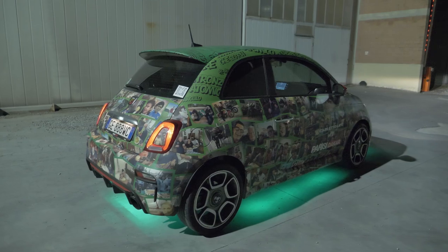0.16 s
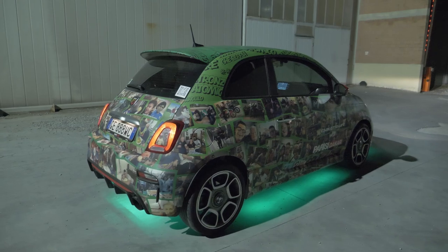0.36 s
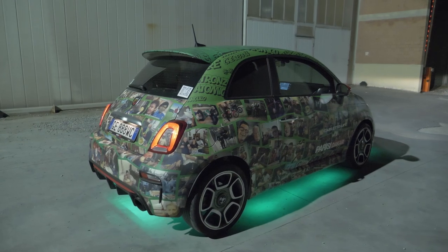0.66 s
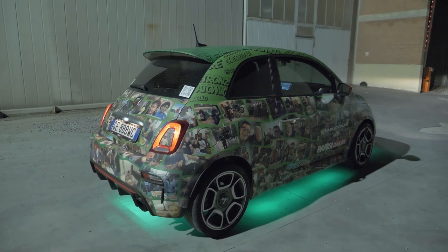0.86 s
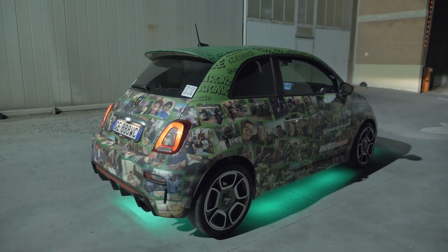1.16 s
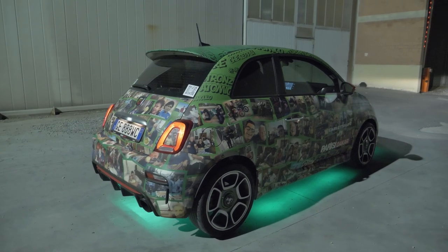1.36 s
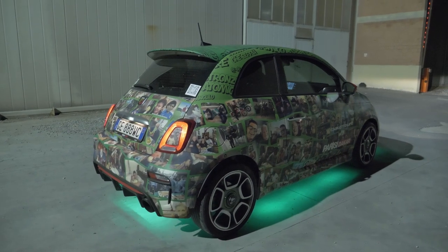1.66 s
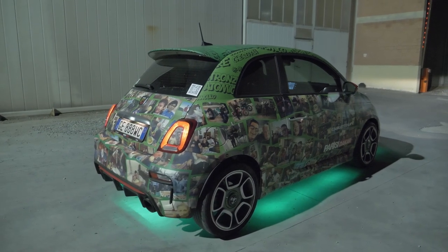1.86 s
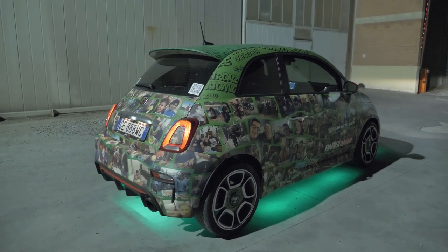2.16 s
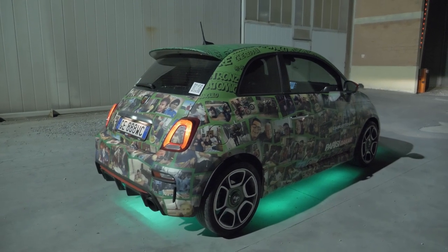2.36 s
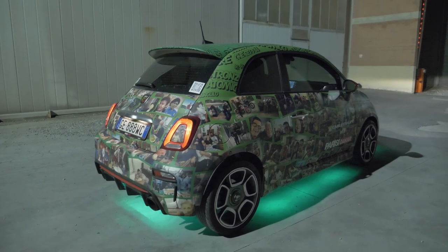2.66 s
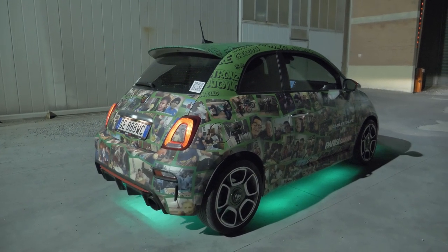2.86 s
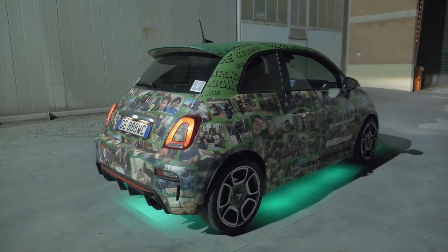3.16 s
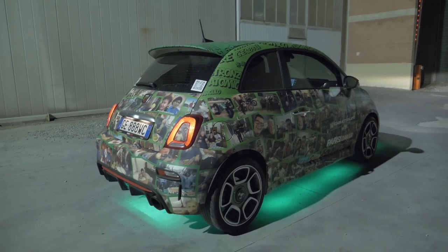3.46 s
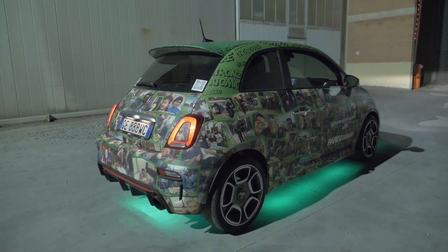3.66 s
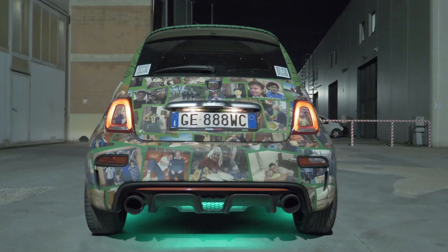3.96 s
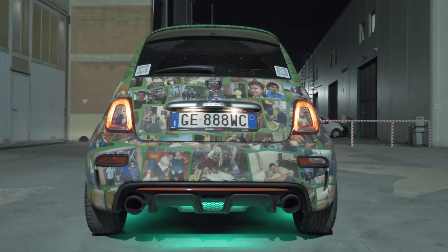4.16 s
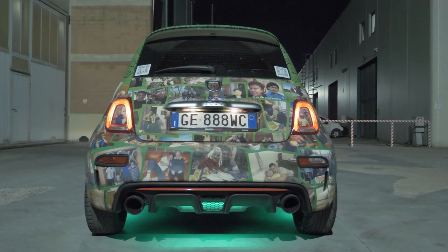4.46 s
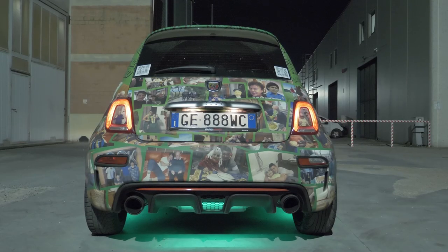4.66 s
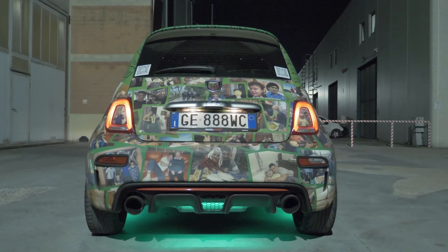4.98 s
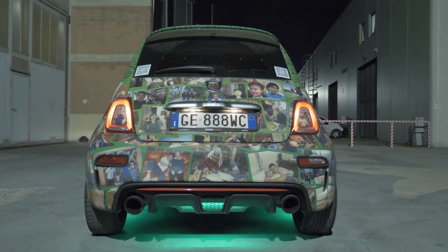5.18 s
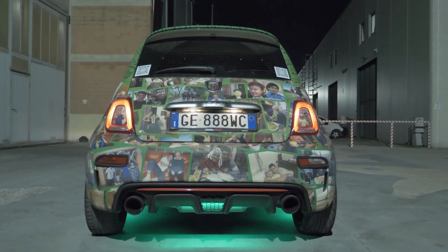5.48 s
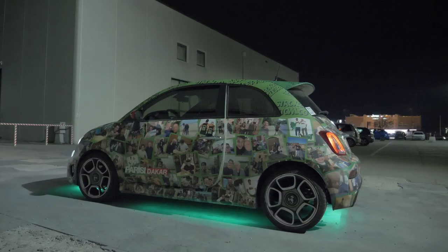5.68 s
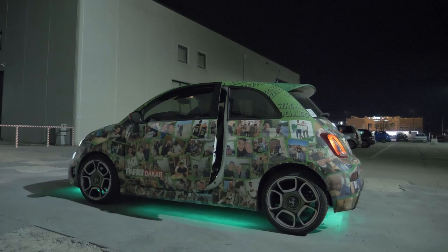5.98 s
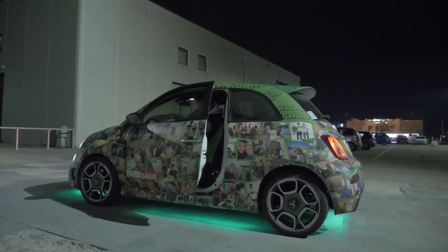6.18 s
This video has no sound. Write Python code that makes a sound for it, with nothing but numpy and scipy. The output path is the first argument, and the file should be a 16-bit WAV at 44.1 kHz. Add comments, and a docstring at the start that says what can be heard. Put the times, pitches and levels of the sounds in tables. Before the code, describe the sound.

Close, booming exhaust of a small idling car turns rounder, then abruptly becomes a quiet hum with faint door latch clicks.

```python
"""A deep boom with a raspy chuff, close to one tailpipe of a small four-cylinder petrol car idling in a
concrete yard at night. The microphone is at the rear quarter, then straight behind the tailpipes, then a
few metres off the side, where the door is unlatched. Each firing sends a boom and a puff of gas down the
exhaust and sets it ringing. Under it lie the rush of engine bay and yard and the fuel pump's whine."""
import sys
import numpy as np
from scipy import signal
from scipy.fft import rfft, irfft, next_fast_len
from scipy.io import wavfile
from scipy.ndimage import uniform_filter1d

SR = 44100
rng = np.random.default_rng(int(sys.argv[2]) if len(sys.argv) > 2 else 0)


def wav_out(sig):
    """Save sig, one row per channel (or a flat mono array), as 16-bit PCM at SR to the path in sys.argv[1]."""
    wavfile.write(sys.argv[1], SR, np.round(np.clip(np.atleast_2d(sig).T, -1, 1) * 32767).astype(np.int16))


N = 279020
T = np.arange(N) / SR

# microphone positions: from t/s, to t/s, a firing of the first cylinder t/s, firing rate/Hz
QUARTER_MIC = (.0455, 3.817, .0810, 28.393)
BEHIND_MIC = (3.817, 5.657, 3.8621, 28.265)
SIDE_MIC = (5.657, 6.4, 5.6848, 28.09)
# steady rush of engine bay and yard at each position: f/Hz, relative spectral level/dB
QUARTER_RUSH = [(20, -1), (60, -0.5), (250, 11.5), (500, -3), (1200, -2), (1500, -8.5), (2200, -12.5),
                (2800, -20.5), (5000, -26), (6700, -29.5), (8500, -24.5), (10000, -38), (13000, -37.5),
                (16000, -44)]
BEHIND_RUSH = [(20, 2), (60, 20), (250, 13), (500, 7), (850, 1.5), (1700, -5), (2700, -15), (3400, -17.5),
               (4600, -18.5), (6700, -21.5), (8500, -20), (10000, -31), (13000, -30), (16000, -41)]
SIDE_RUSH = [(20, 3), (60, 4), (250, 11.5), (500, 2.5), (750, -1.5), (1200, -9), (2000, -12.5),
             (2800, -20.5), (5000, -24), (6600, -27), (8600, -24), (10000, -37), (13000, -35), (16000, -44)]
# faint electrical whistles: f/Hz, relative level/dB
WHISTLES = [(6002, -73), (8027, -75), (12010, -77.5)]
# fuel pump from the rear quarter, where its whine fades in and out: t/s, f/Hz, level/dB
QUARTER_WHINE = [(0.08, 3447, -47.5), (0.65, 3440, -53), (0.97, 3450, -46), (1.21, 3446, -59),
                 (2.14, 3447, -48), (2.18, 3447, -53), (3.01, 3450, -44), (3.63, 3440, -55),
                 (3.78, 3449, -50)]
# door latch clicks: t/s, relative level/dB, f/Hz
LATCH_CLICKS = [(5.7813, -40, 3840), (5.8024, -40, 4750), (5.9419, -42, 7540), (5.984, -37, 5110)]
# colour of the gas puffs (the side shares the one from behind): f/Hz, relative spectral level/dB
QUARTER_PUFF = [(300, -26), (600, 3), (1400, -1.5), (2300, -18), (2700, -7.5), (3600, -12), (4700, -14.5),
                (5400, -22), (8400, -22), (10000, -29.5), (13000, -29.5), (16000, -44)]
BEHIND_PUFF = [(300, -8), (700, 1), (1100, -5), (2000, -3), (2700, -11.5), (3400, -0.5), (4500, -17.5),
               (8500, -13), (10000, -28), (13000, -22.5), (16000, -33)]
# two burns that bark out above the rest: t/s, extra force/dB
HARD_BURNS = [(4.216, 5), (5.065, 8.5)]
# exhaust resonances: f/Hz, width/Hz, level/dB, lag after the boom/s, turbulent share/0-1,
# then kick/dB for each of the four cylinders
QUARTER_RINGS = [ (381.5, 34, -33, .003, 0.0062, -19, -3, -12.5, -12),
                 (590, 67, -48.5, -.004, 0.36, -5, -8, -4, -5),
                 (925, 93, -37, -.0075, 0.11, -7.5, -6, -6.5, 2),
                 (1036, 105, -42, -.007, .1, -20, -9.5, -8, 2.5),
                 (1168.4, 94, -35.5, -.007, 0.2, -3.5, -1, 0, 1.5),
                 (1219, 45.5, -39.5, -.006, 0.5, -4.5, 3, -4, 1),
                 (1682, 253, -42.5, -.005, 0.68, 4.5, 5.5, -2.5, -12),
                 (2015, 130, -51, -0.004, 0.57, 1, 1, 0, -2),
                 (2248, 110, -47, -.0065, 0.52, 2, 3.5, 1.5, -1),
                 (2846, 160, -58.5, -.0065, 0.74, 6, -1, -9, 10),
                 (4730, 110, -65.5, -0.01, 0.74, 1, 4, -16, 2)]
BEHIND_RINGS = [ (330.3, 43, -36.5, .004, 0.32, -5, -3, -4.5, -1.5),
                (615, 48, -35.5, -.004, 0.076, -7, 3.5, -20, 1),
                (1080, 86, -50, -0.0036, 0.91, -1, 4, -7, 4),
                (1516, 66, -45.5, -.007, 0.17, -5, -5.5, -3, 0.5),
                (1682, 146, -44.5, -.007, 0.4, -10, -11, 0.5, -6),
                (2300, 230, -55, -.007, 0.62, -1, -3, 0, -2),
                (3960, 160, -58.5, -.007, 0.75, 0, -4, -3, -1)]
SIDE_RINGS = [ (333, 50, -47, -0.018, 0.2, -11, -1, -12, 0), (627, 41, -44.5, -.002, .1, -13, 2, -17, 0),
              (1640, 160, -56.5, -.005, 0.81, -5, -7, 0, 0)]
# orders of the exhaust boom: multiple of the firing rate, relative level/dB
QUARTER_BOOM = [(1, -18.5), (2, -11), (3, -11), (4, 2), (5, -5), (6, -4.5), (7, -10.5), (8, -15), (9, -40),
                (10, -27.5), (11, -13.5)]
BEHIND_BOOM = [(1, -16), (2, -15.5), (3, -10.5), (4, 3.5), (5, 1.5), (6, -1.5), (7, -15), (8, -17),
               (9, -42), (10, -50.5), (11, -20)]
SIDE_BOOM = [(1, -13), (2, -11), (3, -11), (4, 2.5), (5, 0), (6, 0.5), (7, -3), (8, -6), (9, -22),
             (10, -32), (11, -25)]


def from_db(db):
    """Decibels to gain."""
    return 10 ** (np.asarray(db) / 20)


def unit_rms(x):
    """Scale to unit power."""
    return x / np.sqrt(np.mean(x ** 2) + 1e-20)


def drift(rate_hz):
    """A smooth random wander of unit power that changes about rate_hz times a second."""
    step, settle = 40, 2000
    pole = np.exp(-2 * np.pi * rate_hz * step / SR)
    chance = rng.standard_normal(N // step + settle + 2)
    slow = signal.lfilter([1], [1, -2 * pole, pole * pole], chance)[settle:]
    return np.interp(np.arange(N) / step, np.arange(len(slow)), unit_rms(slow))


def resonate(x, hz, width_hz):
    """A resonance applied twice: it swells, dies away and has steep skirts."""
    r = np.exp(-np.pi * width_hz / SR)
    section = [(1 - r * r) / 2, 0, (r * r - 1) / 2, 1, -2 * r * np.cos(2 * np.pi * hz / SR), r * r]
    return signal.sosfilt([section, section], x + 1e-18)


def swell(kicks, rise_s):
    """Every kick becomes a hump that peaks after rise_s and fades."""
    pole = np.exp(-1 / (rise_s * SR))
    return signal.lfilter([1], [1, -2 * pole, pole * pole], kicks + 1e-18)


def rush(spectrum):
    """A steady rush: noise of unit power with the given colour."""
    hz, db = np.transpose(spectrum)
    size = next_fast_len(N)
    log_hz = np.log(np.fft.rfftfreq(size, 1 / SR) + 1)
    gain = from_db(np.interp(log_hz, np.log(hz), db, left=-np.inf))
    return unit_rms(irfft(rfft(rng.standard_normal(size)) * gain, size)[:N])


def whistle(hz, waver_hz, flutter):
    """A tone of unit power that wavers in pitch and strength."""
    phase = 2 * np.pi * np.cumsum(hz + waver_hz * drift(9.44)) / SR
    return unit_rms(np.sin(phase) * (1 + flutter * drift(62)))


def fuel_pump(whine_db, hz, waver_hz, flutter, whistle_gain_db):
    """The pump's whine, with faint electrical whistles above it."""
    whine = from_db(whine_db) * whistle(hz, waver_hz, flutter)
    whistles = sum(from_db(db) * whistle(f, waver_hz=18, flutter=0.7) for f, db in WHISTLES)
    return whine + from_db(whistle_gain_db) * whistles


def door(click_gain_db=-8, open_s=5.975, air_peak_db=-29):
    """The latch clicks, then the opening door pushes a slow wave of air."""
    clicks = 0
    for at_s, db, hz in LATCH_CLICKS:
        hump = swell(signal.unit_impulse(N, int(at_s * SR)), rise_s=0.0017)
        hiss = unit_rms(resonate(rng.standard_normal(N), hz, width_hz=4500))
        clicks += from_db(db + click_gain_db) * hump / hump.max() * hiss
    air = resonate(signal.unit_impulse(N, int(open_s * SR)), hz=27, width_hz=14)
    return clicks + from_db(air_peak_db) * air / np.abs(air).max()


def crank(mic):
    """Firings counted since the first cylinder fired; the idle wanders a little."""
    _, _, first_s, firing_hz = mic
    wander_s = .0003 * drift(1.5) + .00008 * drift(20)
    return (T - first_s + wander_s) * firing_hz


def burn_force(count, settled_db=1.1, build_db=3, build_s=0.72, spread_db=1.8):
    """Force behind the rasp, in dB: it builds up at first, and each burn has a strength of its own."""
    firing = np.round(count - np.round(count[0])).astype(int)
    chance = rng.standard_normal(N)[firing]
    barks = sum(db * (np.abs(T - at_s) < .017) for at_s, db in HARD_BURNS)
    return settled_db - build_db * np.exp(-T / build_s) + spread_db * chance + barks


def firings(count, cylinder_db, uneven_db, force_db):
    """One kick per firing: the four cylinders differ, and no two burns are alike."""
    at = np.flatnonzero(np.diff(np.floor(count)) > 0)
    cylinder = np.round(count[at]).astype(int) % len(cylinder_db)
    chance = rng.standard_normal(N)[:len(at)]
    kicks = np.zeros(N)
    kicks[at] = from_db(np.asarray(cylinder_db)[cylinder] + force_db[at] + uneven_db * chance)
    return kicks


def gas_puffs(mic, count, force_db, spectrum, cylinder_db, lead_s, rise_s):
    """Gas spits from the tailpipe at the pressure crest just ahead of each trough of the boom."""
    *_, firing_hz = mic
    puff_db = 0.45 * force_db  # the puffs only partly follow the burn
    kicks = firings(count + lead_s * firing_hz, cylinder_db, uneven_db=1, force_db=puff_db)
    return unit_rms(swell(kicks, rise_s)) * rush(spectrum)


def pipe_rings(mic, count, force_db, resonances, burst_s, bark_above_hz=1100):
    """Each firing drives the pipe's resonances with a clean kick and a burst of turbulence."""
    *_, firing_hz = mic
    out = 0
    for hz, width_hz, db, lag_s, turbulent, *cylinder_db in resonances:
        # a harder burn has a steeper front, which only the high resonances feel
        bark_db = force_db * (hz > bark_above_hz)
        kicks = firings(count - lag_s * firing_hz, cylinder_db, uneven_db=.5 + turbulent, force_db=bark_db)
        bursts = swell(kicks, burst_s) * rng.standard_normal(N)
        clean = unit_rms(resonate(kicks, hz, width_hz))
        rough = unit_rms(resonate(bursts, hz, width_hz))
        out += from_db(db) * (np.sqrt(1 - turbulent) * clean + np.sqrt(turbulent) * rough)
    return out


def boom(count, orders, bass_lag_rad, smear_rad, flutter):
    """The orders meet in one pressure trough per firing; the silencer resonates around the fourth."""
    pressure = 0
    for order, db in orders:
        # lower orders come late; higher ones are smeared by dispersion in the pipe
        lag = bass_lag_rad * (order < 4) - smear_rad * (order > 4) * (order - 6) ** 2
        strength = from_db(db) * (1 + flutter * drift(9.2))
        pressure -= strength * np.cos(2 * np.pi * order * count - lag)
    return unit_rms(pressure)


def rear_quarter(mic):
    """Microphone close to one tailpipe: a deep boom with a raspy chuff."""
    count = crank(mic)
    force_db = burn_force(count)
    out = from_db(-15) * boom(count, QUARTER_BOOM, bass_lag_rad=1.15, smear_rad=0.574, flutter=0.05)
    out += pipe_rings(mic, count, force_db, QUARTER_RINGS, burst_s=0.0025)
    out += from_db(-42) * gas_puffs(mic, count, force_db, QUARTER_PUFF,
                                    cylinder_db=(-0.2, 0.28, -1.6, -0.69), lead_s=0.0062, rise_s=0.0027)
    out += from_db(-30.5) * rush(QUARTER_RUSH)
    at_s, hz, db = np.transpose(QUARTER_WHINE)
    whine_db, whine_hz = np.interp(T, at_s, db), np.interp(T, at_s, hz)
    return out + fuel_pump(whine_db, whine_hz, waver_hz=4.4, flutter=0.2, whistle_gain_db=5)


def behind(mic):
    """Microphone facing both tailpipes: a rounder throb, softer puffs and a clear whine."""
    count = crank(mic)
    force_db = burn_force(count)
    out = from_db(-14) * boom(count, BEHIND_BOOM, bass_lag_rad=2.5, smear_rad=0.39, flutter=0.034)
    out += pipe_rings(mic, count, force_db, BEHIND_RINGS, burst_s=0.0041)
    out += from_db(-45) * gas_puffs(mic, count, force_db, BEHIND_PUFF,
                                    cylinder_db=(-0.41, 0, 1.8, -0.19), lead_s=0.0061, rise_s=0.0069)
    out += from_db(-30.5) * rush(BEHIND_RUSH)
    return out + fuel_pump(whine_db=-40, hz=3449, waver_hz=1.5, flutter=0.13, whistle_gain_db=7)


def side(mic):
    """Microphone a few metres off the flank: a quiet hum, and the door opens."""
    count = crank(mic)
    force_db = burn_force(count)
    out = from_db(-27.5) * boom(count - .08, SIDE_BOOM, bass_lag_rad=3.5, smear_rad=0.55, flutter=0.073)
    out += pipe_rings(mic, count, force_db, SIDE_RINGS, burst_s=0.0025)
    out += from_db(-58.5) * gas_puffs(mic, count, force_db, BEHIND_PUFF,
                                      cylinder_db=(-1, 0, 0, 1), lead_s=0.011, rise_s=0.0053)
    out += from_db(-36) * rush(SIDE_RUSH)
    out += fuel_pump(whine_db=-53, hz=3444, waver_hz=2.1, flutter=.1, whistle_gain_db=-3)
    return out + door()


def scene():
    """The three microphone positions follow one another abruptly, in mono."""
    out = np.zeros(N)
    for position, mic in (rear_quarter, QUARTER_MIC), (behind, BEHIND_MIC), (side, SIDE_MIC):
        start_s, end_s, _, _ = mic
        live = ((T >= start_s) & (T < end_s)).astype(float)
        out += position(mic) * uniform_filter1d(live, size=64)
    return out[None]


def record(dry):
    """The microphone chain cuts the top steeply above 15.8 kHz."""
    lowpass = signal.ellip(12, .1, 90, 15800, fs=SR, output="sos")
    return signal.sosfilt(lowpass, dry)


dry = scene()
out = record(dry)
wav_out(out)
```